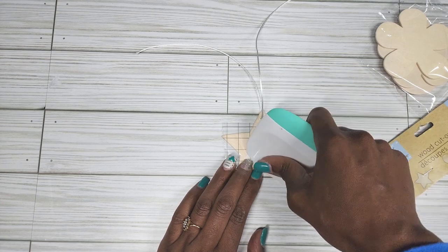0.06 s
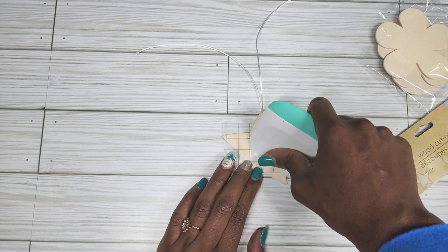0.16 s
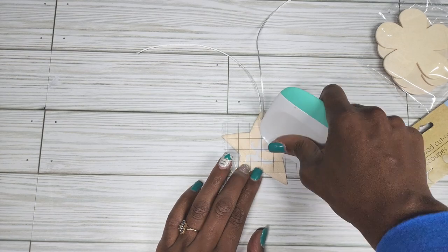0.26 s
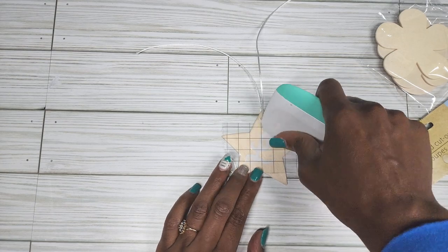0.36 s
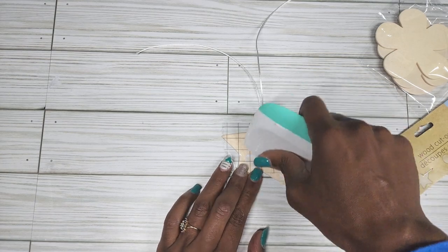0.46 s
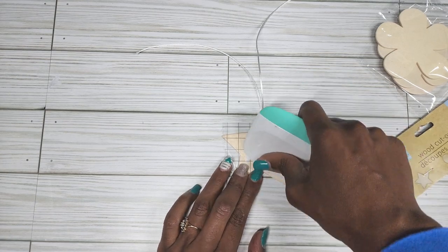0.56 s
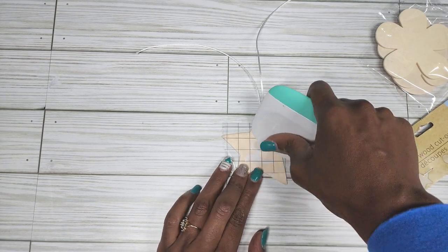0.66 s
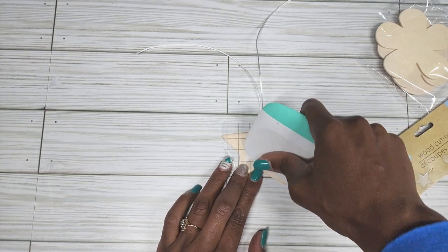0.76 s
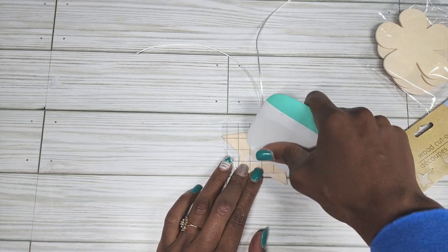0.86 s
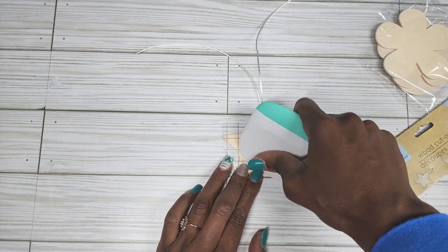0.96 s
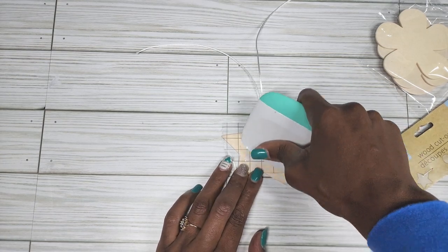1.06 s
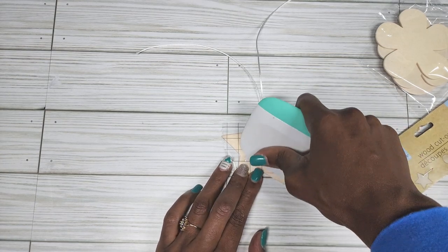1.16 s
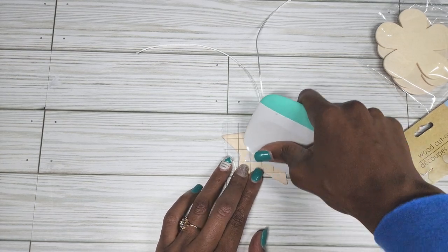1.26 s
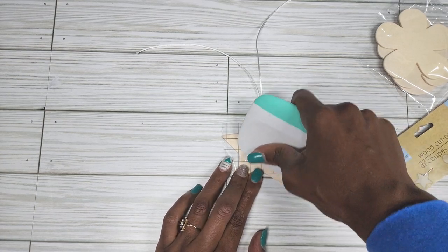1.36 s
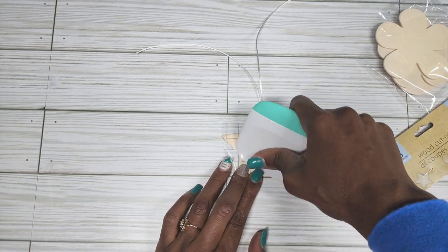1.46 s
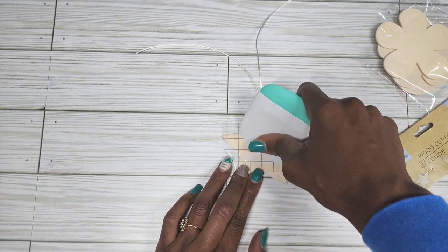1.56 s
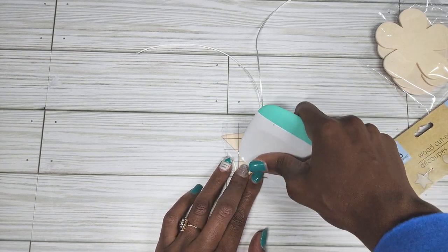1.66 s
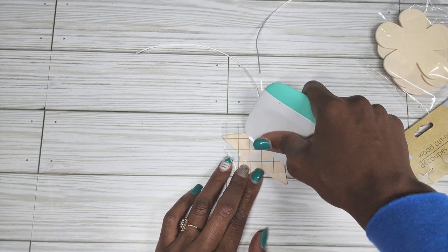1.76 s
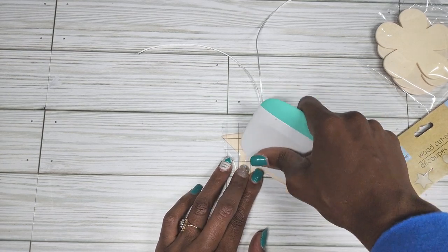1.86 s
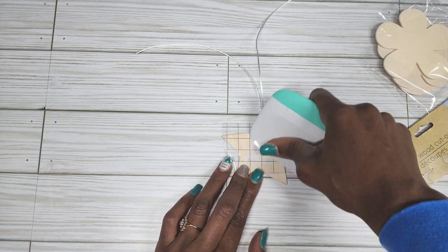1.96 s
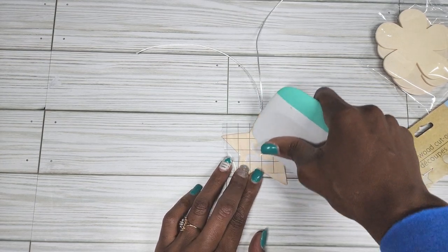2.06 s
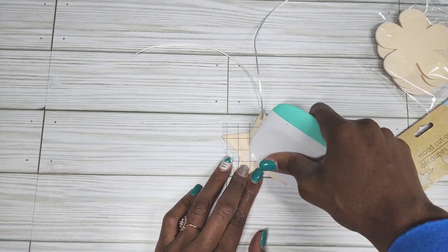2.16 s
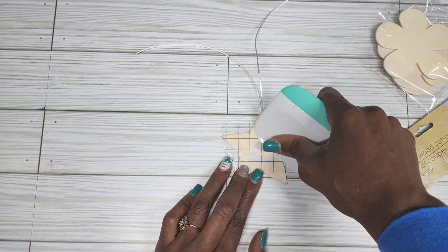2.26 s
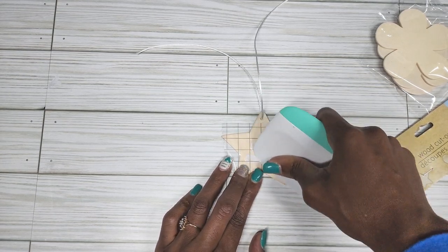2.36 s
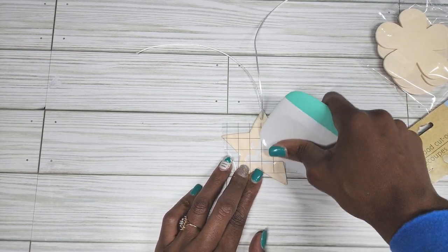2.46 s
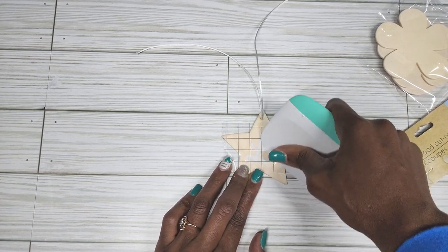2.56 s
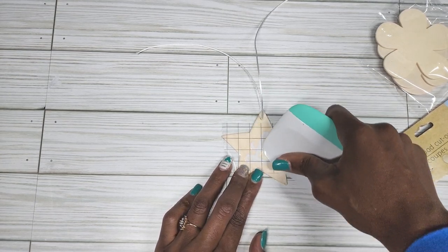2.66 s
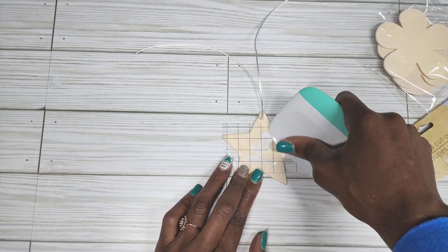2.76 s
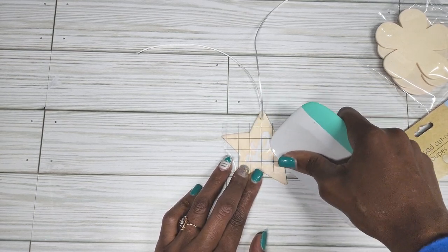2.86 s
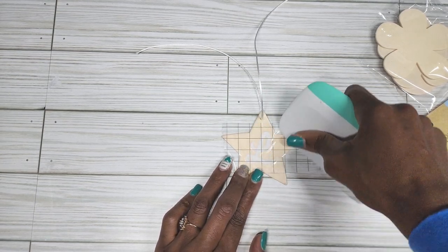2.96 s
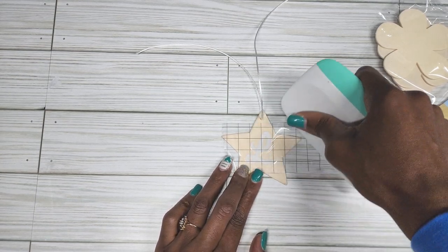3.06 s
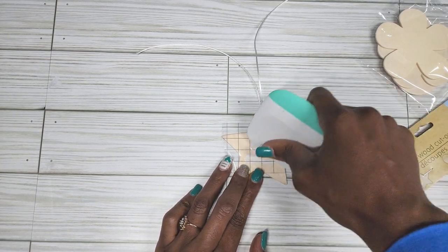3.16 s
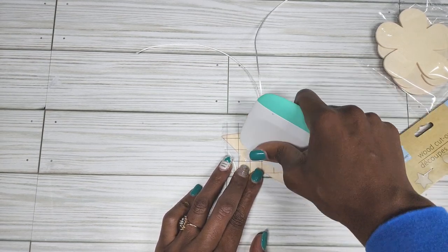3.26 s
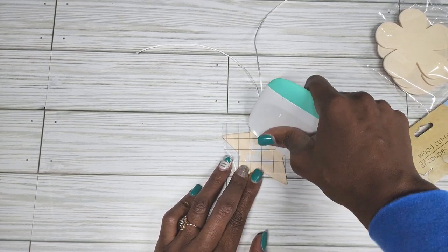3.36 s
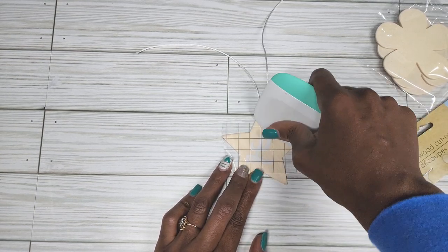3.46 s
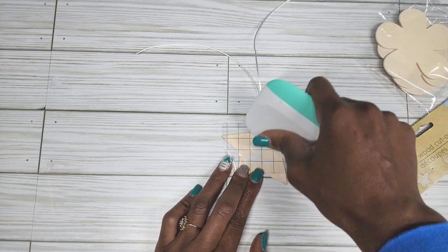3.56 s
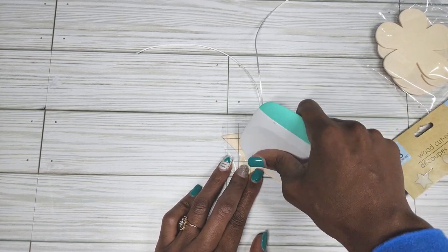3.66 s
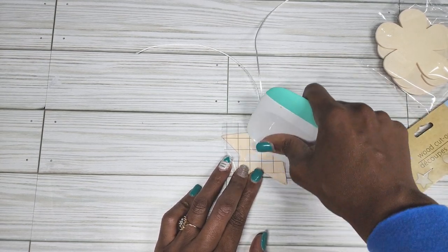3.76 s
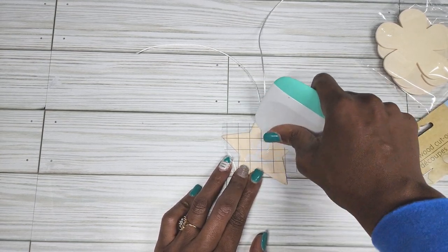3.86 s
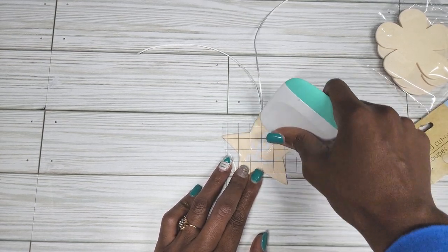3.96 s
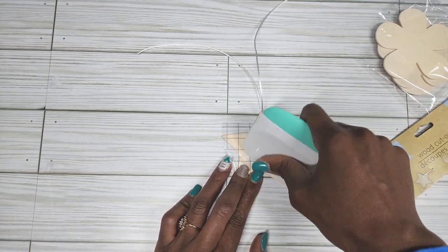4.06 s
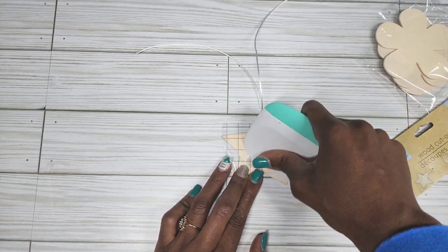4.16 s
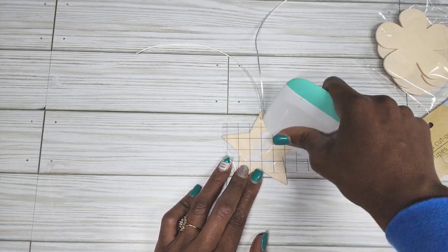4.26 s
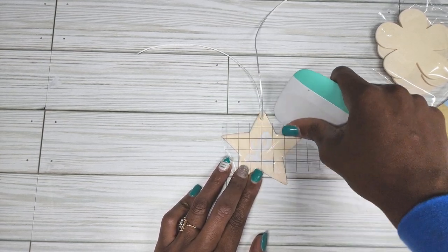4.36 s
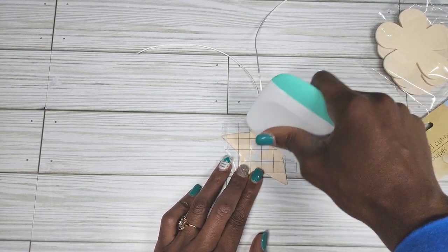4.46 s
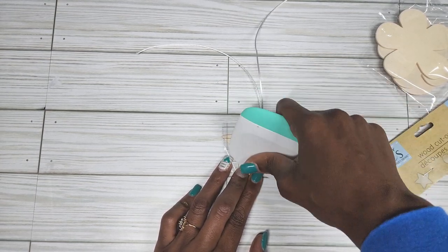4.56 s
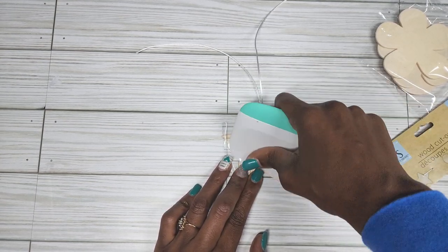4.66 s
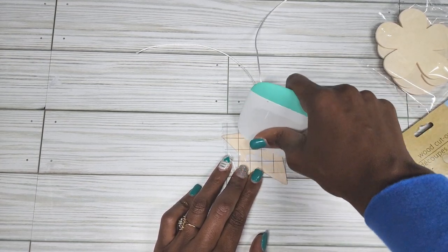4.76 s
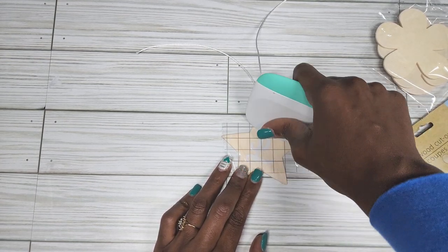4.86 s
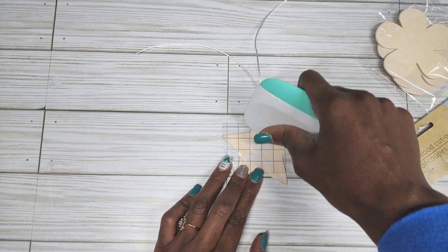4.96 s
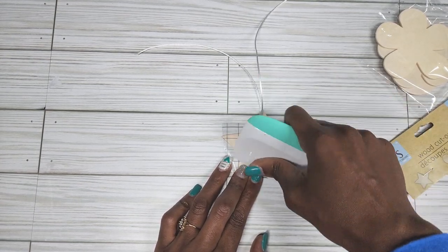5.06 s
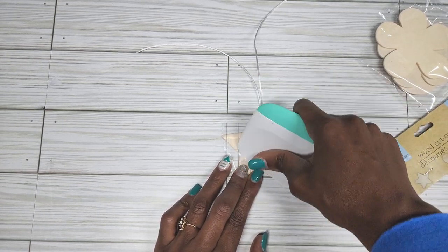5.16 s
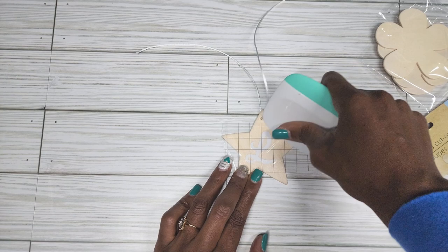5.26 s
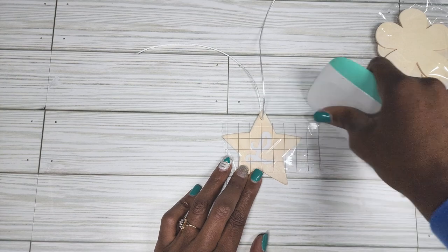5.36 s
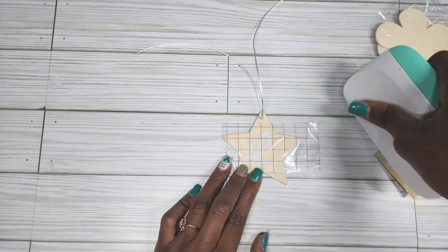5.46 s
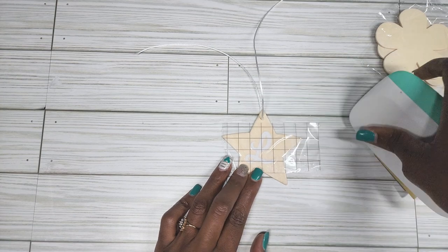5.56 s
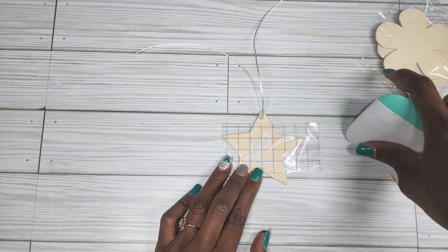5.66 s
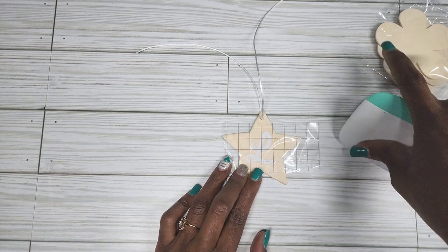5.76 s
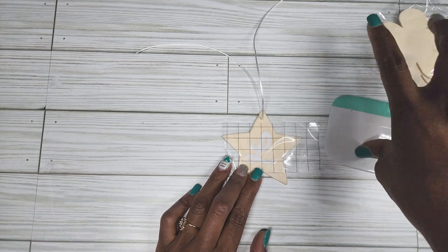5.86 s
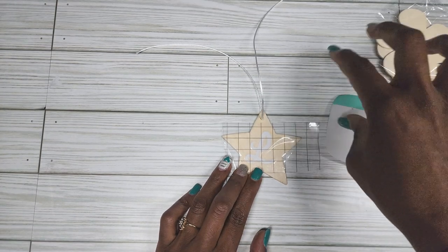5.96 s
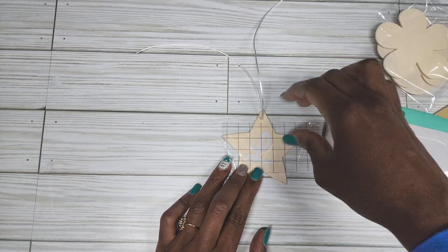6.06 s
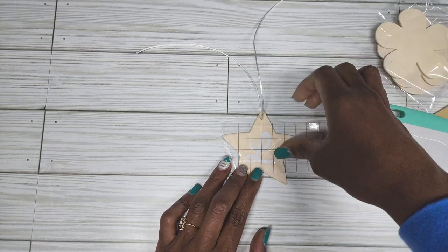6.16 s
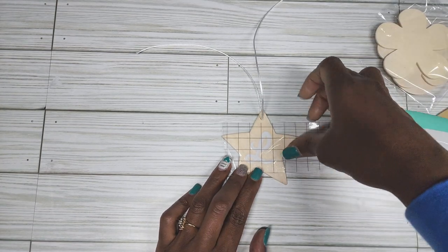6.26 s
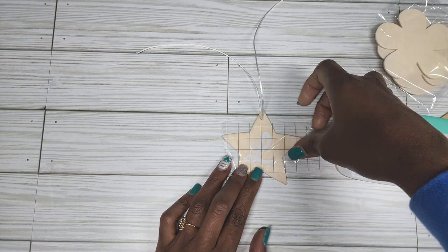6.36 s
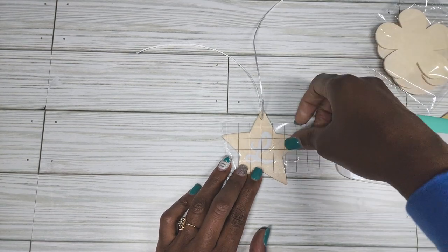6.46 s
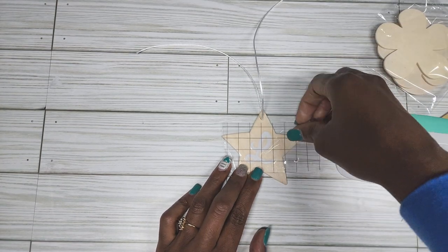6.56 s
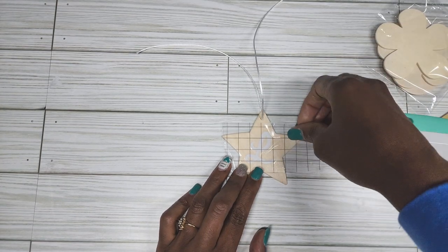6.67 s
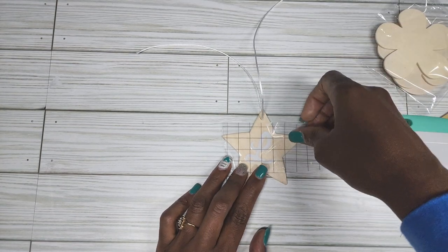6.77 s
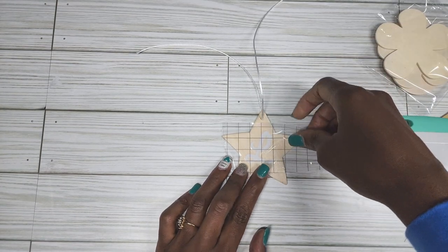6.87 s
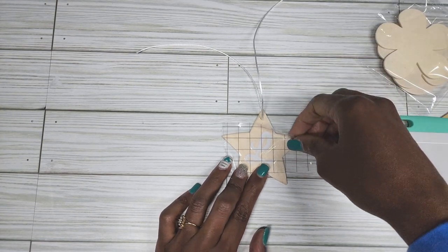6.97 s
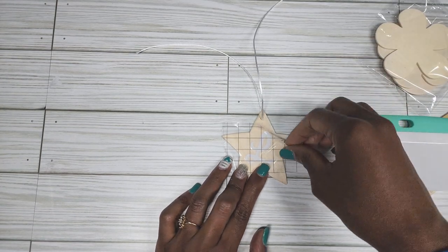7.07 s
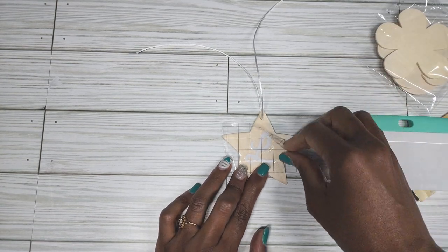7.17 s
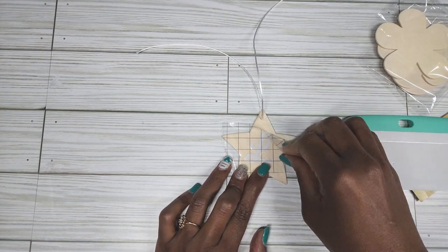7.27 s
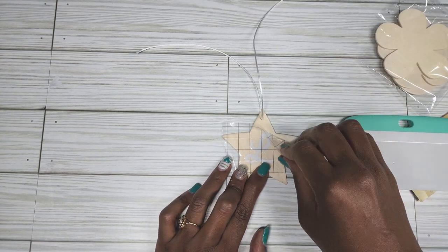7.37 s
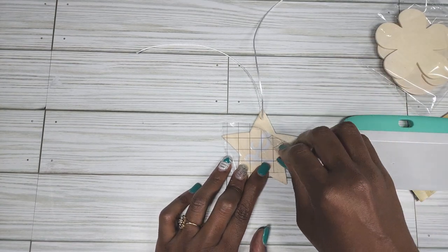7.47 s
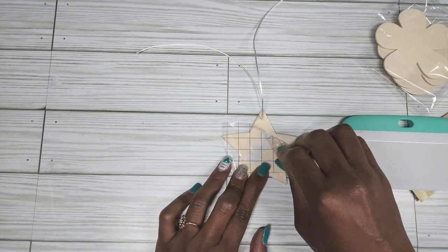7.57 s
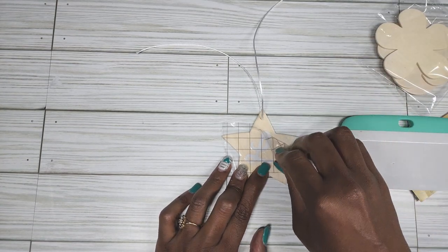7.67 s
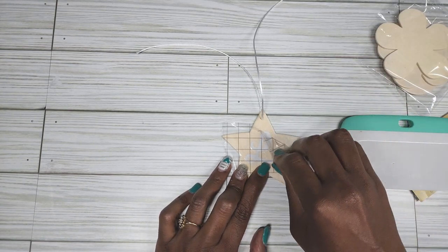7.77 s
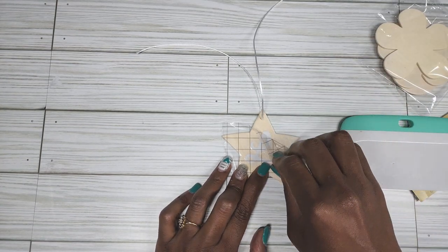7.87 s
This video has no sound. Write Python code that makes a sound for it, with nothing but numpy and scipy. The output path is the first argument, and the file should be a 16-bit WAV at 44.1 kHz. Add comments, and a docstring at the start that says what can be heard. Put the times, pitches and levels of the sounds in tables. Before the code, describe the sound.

A hard plastic scraper burnishes sticky film on a little wooden shape on a tabletop. A loud crack opens, then even back-and-forth rasping, spaced pushes with clicks, and two pairs of bright snaps. It tumbles onto the table with a hollow knocking rattle. Quiet finger bumps, film rustle and sticky ticks end it. Close stereo microphone, short room reflections, faint low background noise.

```python
"""A plastic blade slides, snaps off the edge of a small wooden star, clicks back down, then scrubs to and fro.
It burnishes vinyl and transfer tape, is dropped and clatters to rest; fingers pick at the crackling tape.
Rubbing is shaped slip noise with edge chatter; contacts are damped modes plus decaying noise bursts.
A small quiet room answers the contacts and rubbing over faint noise and a low rumble of hands on the table."""
import sys
import numpy as np
from scipy import signal
from scipy.fft import rfft, irfft, next_fast_len
from scipy.io import wavfile
from scipy.ndimage import map_coordinates

SR = 44100
rng = np.random.default_rng(int(sys.argv[2]) if len(sys.argv) > 2 else 0)


def unload_audio(sound):
    """Save the sound as a 16-bit wav file, at the path given as the first command line argument."""
    columns = np.transpose(np.atleast_2d(sound))
    # keep every value between -1 and 1, then stretch to whole-number steps
    steps = np.round(np.clip(columns, -1, 1) * 32767)
    wavfile.write(sys.argv[1], SR, steps.astype(np.int16))


N = 349272
T = np.arange(SR // 2) / SR  # time after a contact [s]

# Table levels are relative: the functions add fixed trims.
# blade set down on the star: (time [s], level [dB], table thump re level [dB])
LANDINGS = [(0.247, -34, -16.5), (0.7004, -33.5, -16), (3.3974, -33, -17), (3.8307, -30.5, -17),
            (4.288, -29, -18.5), (4.7573, -30.5, -15.5), (5.254, -44.5, -13.5), (5.2653, -36, -8.5),
            (5.293, -46.5, -12)]
# blade snaps off the star's edge: (time [s], level [dB], table thump re level [dB], room [dB], right over left [dB])
SNAPS = [(0.093, -15.5, -20.5, -7.5, 0), (4.5144, -15.5, -44, -2.5, -0.7), (4.5483, -22, -18.5, -6.5, 9.5),
         (5.4935, -15.5, -32, -4, 0.7), (5.5102, -17.5, -48.5, 1, 1.4)]
# blade's edge catches lightly: (time [s], level [dB], tape tick re level [dB])
TAPS = [(0.4053, -44.5, -12), (0.5664, -58.5, -4), (2.9245, -41.5, -3), (3.213, -44.5, -3.5),
        (3.705, -49.5, -14), (4.095, -56, 7.5), (4.147, -48, -10), (4.4367, -49, 2), (5.107, -47.5, -10),
        (5.5474, -18, -32), (5.66, -32, -12.5), (5.7833, -48, -14)]
# fingernail clicks on the star: (time [s], level [dB])
NAIL_CLICKS = [(7.2001, -23), (7.2649, -45.5), (7.7947, -65)]
# dropped scraper hits and tumbles: (time [s], level [dB], table boom re level [dB], shell ring re level [dB])
BOUNCES = [(6.0786, -17.5, 0.5, -21), (6.0852, -18.5, 2, -7), (6.0952, -19.5, -5.5, 1),
           (6.1304, -29, -7, -17), (6.153, -26.5, -2.5, 13), (6.194, -27.5, -1, -8),
           (6.2064, -32, -25, -11), (6.2556, -24.5, -5, -1)]
# sticky tape ticks when picked at: (time [s], level [dB])
TAPE_TICKS = [(6.546, -50), (6.564, -43), (6.675, -39.5), (6.7344, -41.5), (6.835, -44), (6.8539, -37),
              (6.9301, -33.5), (6.96, -46)]
# fingers bump the table: (time [s], level [dB], brushing re level [dB])
BUMPS = [(5.856, -59, 15), (5.929, -48, -10), (5.952, -48, -5.5), (6.029, -44, 8.5), (6.629, -42.5, -7.5),
         (7.043, -46, 1.5), (7.128, -41, -4)]

# Modes; ring() damps with at least 8 Hz width and scatters the levels.
# blade held in the hand: (frequency [Hz], width [Hz], level [dB])
BLADE_MODES = [(1670, 120, -5), (2200, 150, 0), (2800, 140, -6), (3300, 110, -9), (4310, 170, -11),
               (5300, 140, -10), (7800, 380, -18)]
# loose scraper: (frequency [Hz], width [Hz], level [dB])
SHELL_MODES = [(1450, 5.2, -11.5), (1600, 16, -1), (1803, 20, -10), (2060, 9, -4), (2230, 24, -3.5),
               (2350, 14, -1), (2943, 40, -5), (2958, 18, -5), (3390, 13, -18)]
# table top when struck: (frequency [Hz], width [Hz], level [dB])
TABLE_MODES = [(152.7, 6.7, -4.5), (179.8, 6.7, -3.5), (219.7, 11, -10.5), (325, 12, -12),
               (412.8, 21, -0.5), (456, 10, -7), (586, 14, -12), (616.5, 11, -11.5), (662, 18, -12.5),
               (724, 14, -14), (914, 6.4, -18), (970, 7.7, -15.5)]
# table damped by the pressing hands: (frequency [Hz], width [Hz], level [dB])
PRESSED_TABLE_MODES = [(49, 22, -3), (98, 46, 2.5), (134.3, 6.7, -6), (171.4, 22, -0.5), (298, 14, -10.5),
                       (448, 21, -19.5), (657, 41, -21.5)]
# resonances of the edge pressed on vinyl, used as a filter: (frequency [Hz], width [Hz], level [dB])
EDGE_MODES = [(670, 83, -11.5), (1273, 260, 0), (1710, 120, -7.5), (2280, 50, -5.5), (3080, 68, -8.5),
              (4230, 140, -16.5)]

# blade rasping on vinyl: (frequency [Hz], level [dB])
RASP_SPECTRUM = [(260, -35.5), (450, -18.5), (790, -8.5), (1150, -6), (1410, 1.5), (1850, -14.5),
                 (2210, -2.5), (2680, -14), (3340, -15), (5000, -20.5), (7400, -31.5), (12000, -35.5),
                 (16000, -38)]
# hiss of rubbing and of handled film: (frequency [Hz], level [dB])
HISS_SPECTRUM = [(1800, -21.5), (2800, -4.5), (4500, -4.5), (7300, -6.5), (8500, -14.5), (11500, -16),
                 (14500, -21.5), (16000, -28.5)]
# table under the blade: (frequency [Hz], level [dB])
RUMBLE_SPECTRUM = [(60, -14.5), (135, 3), (230, -17.5), (295, -1.5), (420, -5), (500, -17.5), (620, -3.5),
                   (800, -22), (1500, -65.5)]
# blade clicking on the star: (frequency [Hz], level [dB])
CLICK_SPECTRUM = [(410, -23.5), (700, -14.5), (1090, -17.5), (2190, -5.5), (2530, -9.5), (3280, -14),
                  (5400, -11), (9480, -20.5), (13000, -21.5), (16000, -32.5)]
# blade springing off the edge: (frequency [Hz], level [dB])
CRACK_SPECTRUM = [(110, -28), (190, -6), (330, -15), (750, -14.5), (1450, -7.5), (1850, -9.5), (2200, 5),
                  (2550, -9.5), (3000, -5), (3700, -7), (5200, -7.5), (9000, -20.5), (12000, -14.5),
                  (16000, -21)]
# scraper hitting the table: (frequency [Hz], level [dB])
CLACK_SPECTRUM = [(290, -34), (500, -7), (586, -4), (1080, -10), (1600, -6), (1930, -17.5), (2100, -6),
                  (2730, -16), (3490, -12.5), (12000, -22.5), (16000, -21.5)]
# dull thud in the table: (frequency [Hz], level [dB])
THUD_SPECTRUM = [(41, -57), (70, -28.5), (179, -8), (244, -10.5), (356, -8.5), (407, -8.5), (520, -16.5),
                 (587, -12), (1300, -25.5), (1690, -56.5), (2860, -120)]
# small dry contact and brushing: (frequency [Hz], level [dB])
NAIL_SPECTRUM = [(400, -22), (1000, -6.5), (2200, -1), (5500, -7.5), (9000, -21.5), (16000, -44)]
# tape tick: (frequency [Hz], level [dB])
TAPE_SPECTRUM = [(710, -51.5), (1200, -18.5), (2150, -7.5), (2480, -9.5), (3470, -2), (4960, -7.5),
                 (6650, 1.5), (11100, -6.5), (16000, -11)]
# faint room noise: (frequency [Hz], level [dB])
FLOOR_SPECTRUM = [(20, -17.5), (45, -4), (100, -2.5), (150, -15.5), (270, -26), (350, -17), (470, -28),
                  (610, -16), (730, -29.5), (1000, -33.5), (1330, -22), (1750, -40.5), (4500, -44.5),
                  (16000, -45)]
# left-right likeness: (frequency [Hz], likeness [0-1])
ALIKE = [(100, .98), (300, .85), (650, .45), (1500, .55), (3200, .55), (7000, .3), (15000, .1)]
# room decay: (frequency [Hz], t60 [s])
ROOM = [(150, 0.27), (530, 0.47), (1400, 0.27), (3700, .29), (10000, 0.27), (16000, 0.031)]

# hands shifting on the table, then nearly still: (time [s], level [dB])
HANDS = [(0, -64), (0.6, -70), (0.999, -62), (2.4, -76), (3.4, -71), (4.2, -65.5), (6.099, -65.5),
         (6.601, -79), (7.9, -83.5)]
# fingertips gripping the film: (time [s], rustle level [dB])
GRIP = [(6.349, -100), (6.47, -70.5), (6.8, -83.5), (7.12, -79), (7.26, -100)]
# even to-and-fro scrubbing: (middle of first stroke [s], middle of last stroke [s], time per stroke [s])
BOUTS = [(0.852, 1.482, 0.105), (1.588, 3.028, 0.12)]
# hand while scrubbing: (time [s], pressure as rasp level [dB], share of blade on loose tape [0-1])
SCRUB = [(0.85, -57, 0), (1.06, -64, 0.25), (1.26, -62.5, .05), (1.379, -71, 0.43), (1.59, -56.5, 0.08),
         (1.8, -56, 0.11), (2.07, -60, 0), (2.31, -55, 0.27), (2.43, -62, 0.36), (2.67, -58.5, 0.86),
         (3.03, -62, 0.72)]
# single pushes across the star: (start [s], end [s], rasp level [dB], share of blade on loose tape [0-1])
PUSHES = [(0, 0.049, -63.5, 0.88), (0.345, 0.492, -68, 0.88), (3.132, 3.213, -51, 0.33),
          (3.503, 3.579, -60.5, 0.64), (3.623, 3.736, -76.5, .6), (3.928, 4.024, -55.5, 0.3),
          (4.092, 4.153, -70, 0.1), (4.382, 4.455, -51, .35), (4.423, 4.529, -61.5, .9),
          (4.868, 5.052, -65, 0.56), (5.394, 5.451, -45, 0.57), (5.441, 5.523, -49, 0.5)]

SLIDING_SHARE = 0.603  # of each scrubbing stroke's time; the rest is the turn
TREMOR_DB, TREMOR_PER_S = 2.4, 100  # grip and slip within a stroke
BACKSTROKE_DB = -2.5  # on every other stroke, from the first
HISS_DB, TAPE_HISS_DB = -15.5, 15.5  # hiss re rasp on bare vinyl; its rise on loose tape
SCRUB_RUMBLE_DB, PUSH_RUMBLE_DB = -63, -62.5  # table under a firm scrubbing stroke; under a push
FIRM_DB = -58  # rasp of a firm stroke
RUMBLE_DB_PER_RASP_DB, TAPE_CUSHION_DB = 0.37, -5.5  # loose tape cushions the table
# edge when slack, fall in mid-stroke, spread between strokes
CHATTER_HZ, CHATTER_SAG_HZ, CHATTER_SCATTER_HZ = 1638, 190.4, 60.1
TAP_RING_DB = -9.5  # blade's ring under a tap, before trim
RATTLE_GAP_S, RATTLE_SHRINK = 0.017, .92  # first gap; each gap over the one before
RATTLE_DB, RATTLE_LOSS_DB = -34.5, 2.5  # first contact; loss per contact
RATTLE_BOOM_DB, RATTLE_RING_DB = 2, 2.5  # re contact, before trim
TOP_HZ = 16050


def amp(db):
    """Decibels to gain."""
    return 10 ** (np.asarray(db) / 20)


def unit(x):
    """x at rms 1."""
    return x / np.sqrt(np.mean(x ** 2) + 1e-20)


def punch(x):
    """A contact scaled to rms 1 over its first 10 ms."""
    return x / np.sqrt(np.mean(x[:, :SR // 100] ** 2) + 1e-20)


def along(points, hz):
    """(Hz, value) points interpolated on a log-frequency axis."""
    point_hz, value = np.transpose(points)
    return np.interp(np.log(hz + 1), np.log(point_hz + 1), value)


def filtered(x, response):
    """x times a response of frequency."""
    n = x.shape[-1]
    size = next_fast_len(n + SR // 8)
    return irfft(rfft(x, size) * response(np.fft.rfftfreq(size, 1 / SR)), size)[..., :n]


def coloured(x, spectrum, size=4096):
    """Stereo x through a minimum-phase filter with the given spectrum."""
    level_db = np.maximum(along(spectrum, np.fft.rfftfreq(size, 1 / SR)), -100)
    cepstrum = irfft(np.log(amp(level_db)))
    # folding the cepstrum makes the filter causal
    cepstrum[1:size // 2] *= 2
    cepstrum[size // 2 + 1:] = 0
    impulse = irfft(np.exp(rfft(cepstrum)))
    return signal.fftconvolve(x, impulse[None], axes=1)[:, :x.shape[1]]


def spread(pair):
    """Two unrelated signals as left and right: alike in the bass, apart in the treble."""
    def mid_side_gains(hz):
        turn = np.arccos(np.clip(along(ALIKE, hz), 0, 1)) / 2
        return np.array([np.cos(turn), np.sin(turn)])
    mid, side = filtered(pair, mid_side_gains)
    return np.array([mid + side, mid - side])


def to_right(db):
    """Gains that make the right channel db louder than the left."""
    return amp([[-db / 2], [db / 2]])


def wobble(knots_per_s, size=N):
    """A smooth random curve through random knots."""
    knots = rng.standard_normal(int(size * knots_per_s / SR) + 4)
    return map_coordinates(knots, [np.arange(size) * knots_per_s / SR])


def add(track, time_s, sound):
    """Mix a sound into the track from time_s, cropped to fit."""
    first = round(time_s * SR)
    sound = sound[:, max(-first, 0):]
    part = track[:, max(first, 0):][:, :sound.shape[1]]
    part += sound[:, :part.shape[1]]


def in_room(x, wet_db, delay_s=0.0028):
    """x plus a diffuse decaying answer of the room, its highest treble dying first."""
    hz, t, noise = signal.stft(rng.standard_normal((2, SR // 2)), SR, nperseg=256)
    decay = amp(-60 * t / along(ROOM, hz)[:, None])
    tail = signal.istft(noise * decay, SR, nperseg=256)[1][:, :len(T)]
    tail *= 1 - np.exp(-(T / delay_s) ** 2)
    tail /= np.linalg.norm(tail[0])
    # long waves reach both channels alike
    tail[1] += filtered(tail[0] - tail[1], lambda f: 1 / (1 + (f / 520) ** 2))
    return x + amp(wet_db) * signal.fftconvolve(x, tail, axes=1)[:, :x.shape[1]]


def burst(spectrum, t60_s):
    """Dense, quickly dying vibration of a contact: coloured decaying noise."""
    noise = spread(rng.standard_normal((2, len(T))) * amp(-60 * T / t60_s))
    return punch(coloured(noise, spectrum))


def ring(modes, skew_rad):
    """Damped modes struck at new strengths, slightly out of phase between left and right."""
    hz, width_hz, db = np.transpose(modes)[:, :, None]
    strength = amp(db + 2 * rng.standard_normal(hz.shape)) * (-1) ** np.arange(len(hz))[:, None]
    phase = skew_rad * rng.standard_normal((2, len(hz), 1))
    damping_hz = np.maximum(width_hz, 8)
    waves = strength * np.exp((2j * hz - damping_hz) * np.pi * T)
    return punch((waves * np.exp(1j * phase)).imag.sum(1))


def friction(n, slips_per_s, grain_db, smooth):
    """Tiny random slips of uneven size over a smooth sliding noise, n samples."""
    happens = rng.random(n) < slips_per_s / SR
    slips = happens * amp(abs(grain_db) * np.minimum(rng.exponential(size=n), 4))
    grains = unit(slips * rng.standard_normal((2, n)))
    return spread(grains + smooth * rng.standard_normal((2, n)))


def spot(x, t60_s, share):
    """x plus many weak resonances of one spot on the star, new at each call."""
    answer = rng.standard_normal(SR // 10) * amp(-60 * T[:SR // 10] / t60_s)
    answer /= np.linalg.norm(answer)
    return x + share * signal.fftconvolve(x, answer[None], axes=1)[:, :x.shape[1]]


def background():
    """Faint room noise, and the low rumble of hands shifting on the table."""
    air = amp(-77.5) * unit(coloured(spread(rng.standard_normal((2, N))), FLOOR_SPECTRUM))
    low_spectrum = [(15, -22.5), (45, -3.5), (90, -6.0), (140, -2.5), (260, -26.0), (800, -49)]
    low = unit(coloured(spread(rng.standard_normal((2, N))), low_spectrum))
    hands_db = np.interp(np.arange(N) / SR, *np.transpose(HANDS))
    return air + amp(hands_db - 3.5 + 0.83 * wobble(29)) * low


def picking():
    """Fingers bump and brush the table and lift the tape, which lets go in sharp ticks."""
    out = np.zeros((2, N))
    for time_s, db in TAPE_TICKS:
        tick = spot(burst(TAPE_SPECTRUM, t60_s=0.024), t60_s=0.042, share=0.6)
        add(out, time_s, amp(db - 14.0) * in_room(tick, wet_db=-9.5))
    attack = 1 - np.exp(-T / 0.00088)
    for time_s, db, brush_db in BUMPS:
        bump = burst(THUD_SPECTRUM, t60_s=0.094)
        bump += amp(brush_db - 4.5) * burst(NAIL_SPECTRUM, t60_s=0.13)
        add(out, time_s, amp(db - 12) * in_room(bump * attack, wet_db=-2.5))
    # film rustles unevenly between the fingertips
    grip_db = np.interp(np.arange(N) / SR, *np.transpose(GRIP), left=-120, right=-120)
    body = friction(N, slips_per_s=700, grain_db=3.5, smooth=0.99)
    rustle = unit(coloured(body, NAIL_SPECTRUM))
    fizz = friction(N, slips_per_s=600, grain_db=2.0, smooth=.8)
    rustle += amp(-5.5) * unit(coloured(fizz, HISS_SPECTRUM))
    handled = in_room(amp(grip_db + 1.5 * wobble(40)) * rustle, wet_db=-0.5)
    return (out + handled) * to_right(1.2)


def rattle(count):
    """Rows like BOUNCES: the scraper rocks to rest, ever faster and softer."""
    k = np.arange(count)
    times_s = BOUNCES[-1][0] + np.cumsum(RATTLE_GAP_S * RATTLE_SHRINK ** k)
    levels_db = RATTLE_DB - RATTLE_LOSS_DB * k
    return [(s, db, RATTLE_BOOM_DB, RATTLE_RING_DB) for s, db in zip(times_s, levels_db)]


def clatter():
    """Each bounce of the dropped scraper rings its shell and booms in the table top."""
    out = np.zeros((2, N))
    attack = 1 - np.exp(-T / 0.0037)
    for time_s, db, boom_db, ring_db in list(BOUNCES) + rattle(count=5):
        # extra 90 dB/s decay: touching the table chokes the shell
        shell = ring(SHELL_MODES, skew_rad=1.1) * amp(-90 * T)
        shell += amp(-3) * burst(NAIL_SPECTRUM, t60_s=.05)
        clack = amp(-8) * burst(CLACK_SPECTRUM, t60_s=.03)
        clack += amp(-27.5) * burst(TAPE_SPECTRUM, t60_s=0.011)
        clack += amp(ring_db - 15.0) * shell
        boom = amp(-10.0) * ring(TABLE_MODES, skew_rad=0.32)
        boom += amp(-4.5) * burst(THUD_SPECTRUM, t60_s=0.081)
        add(out, time_s, amp(db) * in_room(clack, wet_db=-4.0, delay_s=0.002))
        add(out, time_s, amp(db + boom_db) * in_room(boom * attack, wet_db=-13.5))
    return out * to_right(2.6)


def taps():
    """Small dry clicks of hard edges; the blade's taps also ring it and tick the tape."""
    out = np.zeros((2, N))
    attack = 1 - np.exp(-T / 0.00095)

    def click():
        return amp(-14) * burst(NAIL_SPECTRUM, t60_s=0.028)

    for time_s, db, tick_db in TAPS:
        tap = click()
        tap += amp(tick_db - 8.0) * burst(TAPE_SPECTRUM, t60_s=0.017)
        tap += amp(TAP_RING_DB - 4.5) * ring(BLADE_MODES, skew_rad=0.31)
        add(out, time_s, amp(db) * in_room(tap * attack, wet_db=-7.5))
    for time_s, db in NAIL_CLICKS:
        add(out, time_s, amp(db) * in_room(click() * attack, wet_db=-13.0))
    return out * to_right(2.6)


def thump():
    """The hand-damped table gives way under the blade with a soft onset."""
    body = ring(PRESSED_TABLE_MODES, skew_rad=0.066) + amp(-8.5) * burst(RUMBLE_SPECTRUM, t60_s=0.1)
    return body * (1 - np.exp(-(T / 0.0047) ** 2))


def landings():
    """The blade clicks on the star; the table thumps, then rebounds more softly."""
    out = np.zeros((2, N))
    for time_s, db, thump_db in LANDINGS:
        contact = burst(CLICK_SPECTRUM, t60_s=.028)
        click = amp(-8.5) * ring(BLADE_MODES, skew_rad=0.94) + amp(-9) * contact
        add(out, time_s, amp(db) * in_room(click, wet_db=-9.5, delay_s=0.0012) * to_right(2.2))
        add(out, time_s + 0.00327, amp(db + thump_db + 4.5) * thump())
        add(out, time_s + 0.043, amp(db + thump_db - 8.5) * thump())
    return out


def snaps():
    """The bent blade springs off the edge and cracks against the table, loud in the room."""
    out = np.zeros((2, N))
    for time_s, db, thump_db, room_db, right_db in SNAPS:
        crack = amp(-11) * burst(CRACK_SPECTRUM, t60_s=.02)
        crack += amp(-22.5) * burst(TAPE_SPECTRUM, t60_s=0.0044)
        direct = amp(-16.5) * ring(BLADE_MODES, skew_rad=0.54)  # heard without the room
        snap = in_room(crack, wet_db=room_db, delay_s=0.002) + direct
        add(out, time_s, amp(db) * snap * to_right(right_db))
        add(out, time_s + 0.0008, amp(db + thump_db - 6.5) * thump())
    return out


def strokes():
    """Scrubbing, then pushes: (middle [s], length [s], rasp [dB], tape share [0-1], rumble [dB])."""
    times_s, pressure_db, on_tape = np.transpose(SCRUB)
    for first_s, last_s, period_s in BOUTS:
        for k, middle_s in enumerate(np.arange(first_s, last_s + period_s / 2, period_s)):
            rasp_db = np.interp(middle_s, times_s, pressure_db) + BACKSTROKE_DB * (k % 2 == 0)
            tape = np.interp(middle_s, times_s, on_tape)
            rumble_db = SCRUB_RUMBLE_DB + RUMBLE_DB_PER_RASP_DB * (rasp_db - FIRM_DB)
            rumble_db += TAPE_CUSHION_DB * tape
            yield middle_s, SLIDING_SHARE * period_s, rasp_db, tape, rumble_db
    for start_s, end_s, rasp_db, tape in PUSHES:
        yield (start_s + end_s) / 2, end_s - start_s, rasp_db, tape, PUSH_RUMBLE_DB


def edge_response(hz):
    """Resonances of the pressed edge, summed with alternating sign."""
    total = 0
    for k, (centre_hz, width_hz, db) in enumerate(EDGE_MODES):
        damping = 1j * hz * width_hz
        total = total + (-1) ** k * amp(db) * damping / (centre_hz ** 2 - hz ** 2 + damping)
    return total


def chatter(speed, pressed_hz, slack_hz, width_hz):
    """A narrow resonance of the edge that sinks as the blade bears down in mid-stroke."""
    noise = spread(rng.standard_normal((2, len(speed))))
    band = filtered(noise, lambda hz: 1 / (1 + (hz / width_hz) ** 2))
    pitch_hz = slack_hz + (pressed_hz - slack_hz) * speed
    return unit(band * np.sin(2 * np.pi * np.cumsum(pitch_hz) / SR))


def rubbing(creep=0.018):
    """Each stroke speeds up and slows down; its slips sound the edge, the tape and the table."""
    out = np.zeros((2, N))
    t = np.arange(SR // 3) / SR - 1 / 6  # re mid-stroke [s]
    n = len(t)
    for middle_s, length_s, rasp_db, tape, rumble_db in strokes():
        half_s = length_s / 2
        swell = np.exp(-(t / half_s) ** 2)
        sliding = (1 + np.tanh((half_s - abs(t)) / .012)) / 2
        # a slow creep outlasts the stroke, so the turn is not silent
        speed = sliding * swell + creep * np.exp(-(t / (half_s + .035)) ** 2)
        tremor = amp(TREMOR_DB * wobble(TREMOR_PER_S, size=n))

        slips = friction(n, slips_per_s=1100, grain_db=3, smooth=.4)
        rasp = amp(1.0) * unit(coloured(slips, RASP_SPECTRUM))
        rasp += amp(-4.0) * unit(filtered(slips, edge_response))
        # harder strokes chatter more, each at its own pitch
        chatter_db = -6 + .25 * (rasp_db - FIRM_DB)
        slack_hz = CHATTER_HZ + CHATTER_SCATTER_HZ * rng.standard_normal()
        rasp += amp(chatter_db) * chatter(swell, slack_hz - CHATTER_SAG_HZ, slack_hz, width_hz=170)

        fine_slips = friction(n, slips_per_s=1900, grain_db=1.0, smooth=0.4)
        hiss = unit(coloured(fine_slips, HISS_SPECTRUM))
        table_slips = friction(n, slips_per_s=3000, grain_db=3.5, smooth=0.88)
        rumble = unit(coloured(table_slips, RUMBLE_SPECTRUM))

        hiss_db = HISS_DB + TAPE_HISS_DB * tape
        scrape = amp(rasp_db) * (amp(2.0) * rasp + amp(hiss_db) * hiss)
        on_star = spot(scrape * speed * tremor, t60_s=0.025, share=0.79)
        table = amp(rumble_db) * rumble * speed
        add(out, middle_s + t[0], on_star + table)
    return in_room(out, wet_db=-7) * to_right(1.9)


def scene():
    """Sum of all layers."""
    return rubbing() + landings() + snaps() + taps() + clatter() + picking() + background()


def record(dry):
    """Steep low-pass: the recorder's band limit."""
    return filtered(dry, lambda hz: 1 / (1 + (hz / TOP_HZ) ** 120))


dry = scene()
out = record(dry)
unload_audio(out)
```